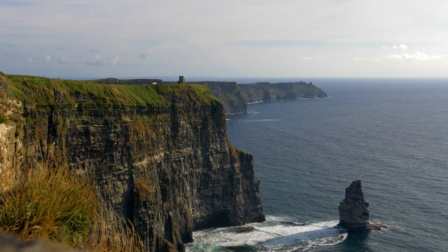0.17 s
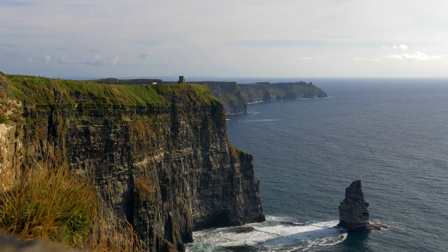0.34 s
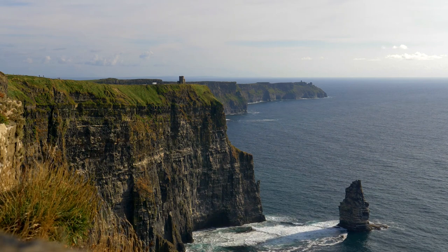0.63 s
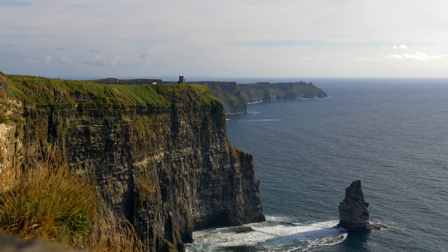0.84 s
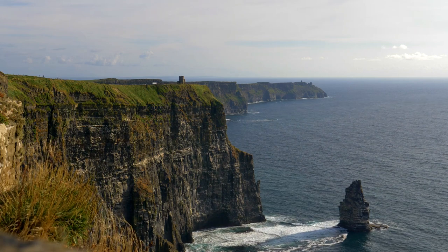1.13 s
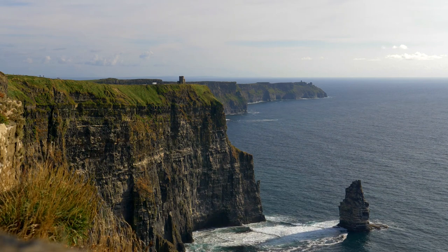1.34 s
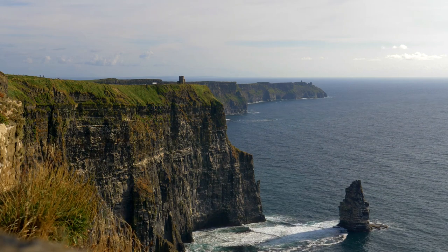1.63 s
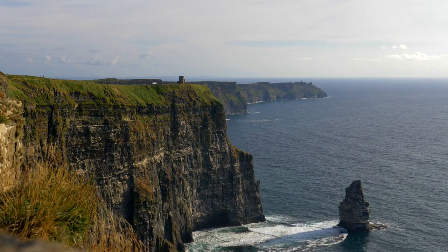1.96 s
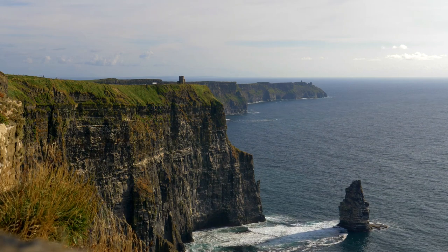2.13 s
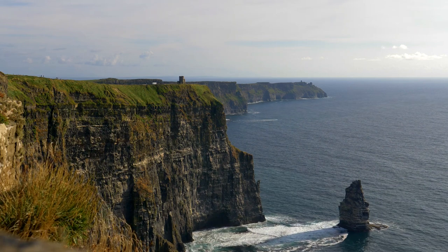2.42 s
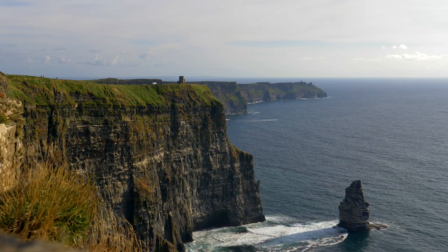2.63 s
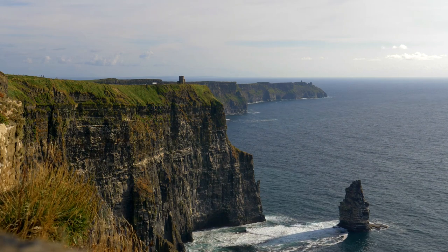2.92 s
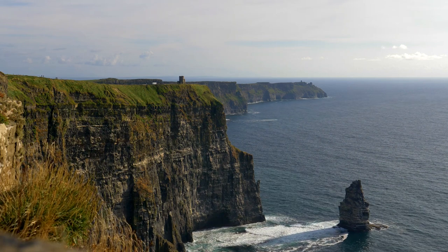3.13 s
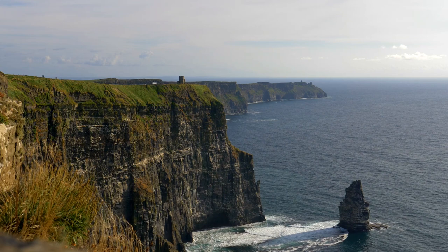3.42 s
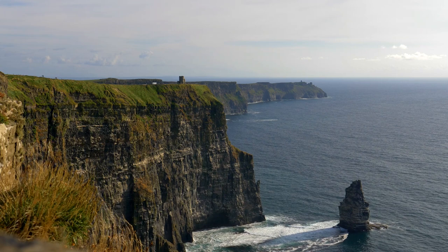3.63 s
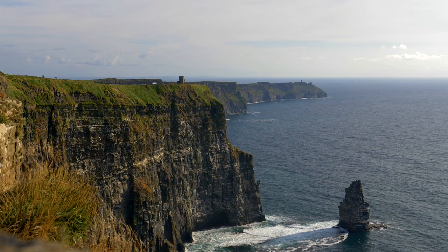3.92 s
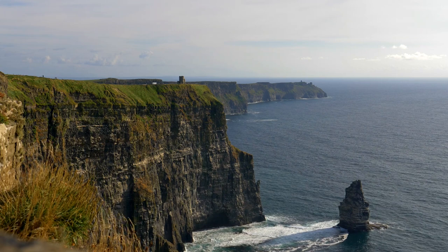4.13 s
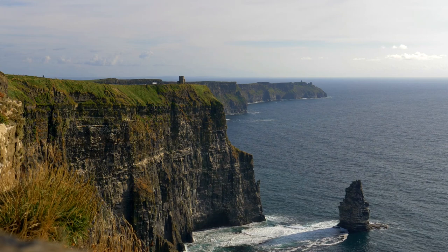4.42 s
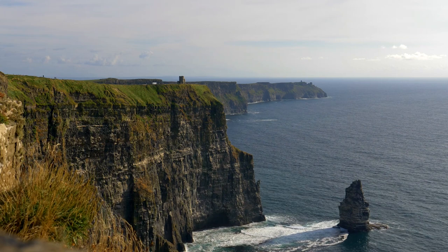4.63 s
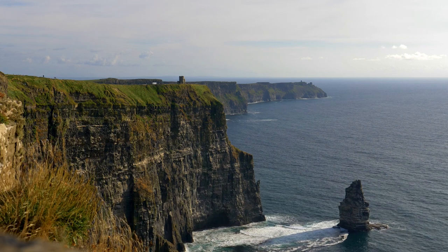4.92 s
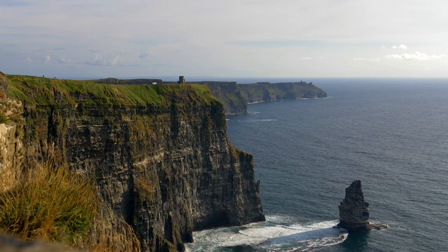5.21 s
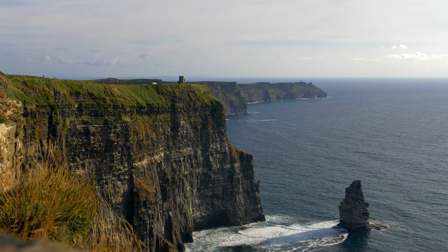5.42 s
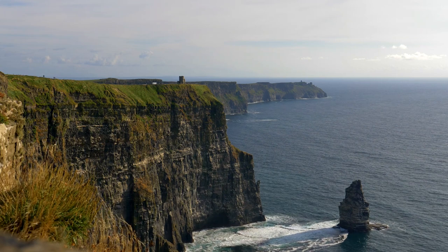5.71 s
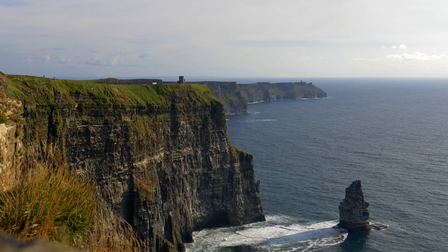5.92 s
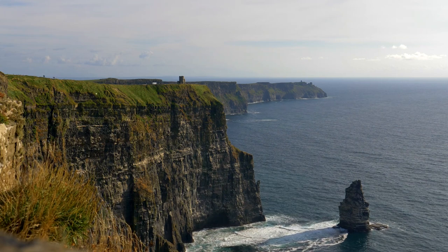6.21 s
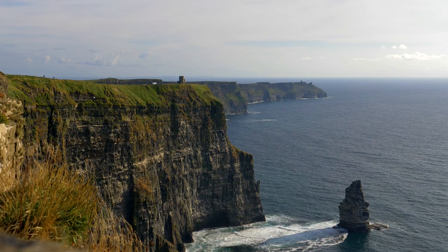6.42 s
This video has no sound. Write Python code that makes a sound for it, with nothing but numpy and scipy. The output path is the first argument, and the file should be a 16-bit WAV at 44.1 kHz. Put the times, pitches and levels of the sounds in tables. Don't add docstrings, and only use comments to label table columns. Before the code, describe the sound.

Overlapping seabird calls, thin whistles and two quick croaks above roaring surf, with a deep wave boom swelling mid-way and hissing foam.

```python
import sys
import numpy as np
from scipy import signal
from scipy.fft import rfft, irfft, next_fast_len
from scipy.io import wavfile
from scipy.ndimage import uniform_filter1d, map_coordinates

SR = 44100
rng = np.random.default_rng(int(sys.argv[2]) if len(sys.argv) > 2 else 0)


def volts_from_decibels(level):
    exponent = np.asarray(level, float) / 20
    return 10 ** exponent


def pcm_store(signal):
    levels = np.round(np.clip(np.atleast_2d(signal), -1, 1) * 32767)
    wavfile.write(sys.argv[1], SR, levels.astype(np.int16).T)


N = 289737

# time_s, level_db
BREAKER_LEVEL = [(0, -55.5), (.25, -55), (.45, -52.5), (.65, -55.5), (1, -55.5), (1.6, -56.5), (2.6, -54),
                 (3.3, -53.5), (3.9, -53.5), (4.4, -52.5), (4.94, -51.5), (5.5, -52), (5.9, -55),
                 (6.57, -55)]
# time_s, moving_water_db, foam_db
WAVE_COURSE = [(0, -58, -60.5), (.5, -52, -60.5), (1.3, -52.5, -56.5), (2.1, -48.5, -52),
               (2.56, -47.5, -47), (2.8, -47, -48.5), (3.3, -44, -47), (3.85, -36.5, -47),
               (4.4, -39.5, -47.5), (5.1, -47.5, -48.5), (5.8, -48, -50), (6.57, -51, -51)]
# time_s, level_db
SURGES = [(.37, -47), (.9, -47), (1.2, -49), (2.05, -45.5), (2.53, -36), (2.92, -37), (3.44, -35.5),
          (3.92, -30), (4.62, -41), (4.97, -36.5), (5.23, -43.5), (5.87, -45), (6.5, -51)]
# frequency_hz, density_db
BREAKER_SPECTRUM = [(200, -21), (400, 0), (650, -1.5), (1100, 0), (1600, 0.5), (2500, -1), (4000, -10),
                    (7000, -16), (11000, -27), (14000, -44)]
RUMBLE_SPECTRUM = [(20, -46), (40, -12), (70, -5.5), (120, 2), (200, -5), (290, -14), (450, -25.5),
                   (900, -49)]
BOOM_SPECTRUM = [(12, -40), (20, -10), (40, -7.5), (75, -2.5), (130, -6.5), (200, -24), (330, -28.5),
                 (600, -57)]
FOAM_SPECTRUM = [(900, -49), (1600, -13), (2500, -1.5), (4000, 1.5), (5500, 2), (8000, -3), (10500, -14.5),
                 (12400, -23), (14000, -39)]
# frequency_hz, correlation (no unit)
SEA_LIKENESS = [(60, -0.15), (150, -0.54), (280, -0.37), (500, -0.51), (1300, -0.27), (3000, -0.39),
                (6000, -0.57), (9000, -0.61), (13000, -0.085)]
BOOM_LIKENESS = [(30, 0.75), (60, 0.94), (100, 0.51), (140, 0.54), (250, 0.63)]
# frequency_hz, phase_rad
SURF_PHASE = [(40, -.07), (60, -.4), (80, -.7), (100, -1.3), (127, -2.2), (160, -3), (270, -4.4),
              (520, -3.14)]
# start_s, level_db, fall_by_20_db_s, bearing_deg
WATER_SLAPS = [
    (1.737, -41.5, .03, -65),
    (2.11, -45, .07, -65),
    (2.5, -45, .12, -62),
    (6.0, -48, .04, -60),
]
# start_s, length_s, level_db, pulse_rate_hz, bearing_deg
CROAKS = [
    (2.418, .026, -38.5, 480, 20),
    (3.424, .046, -38.5, 325, 14),
]
# centre_hz, width_hz, level_db
THROAT_RESONANCES = [(2250, 280, 1), (2950, 380, 0)]
# start_s, length_s, start_hz, end_hz, level_db
FAR_CALLS = [(0, .07, 2928, 2778, -47), (.812, .08, 2040, 1945, -49), (1.345, .125, 1870, 1735, -53),
             (1.381, .06, 4318, 3990, -52), (2.352, .036, 2970, 2815, -42), (2.832, .105, 2542, 2502, -51),
             (4.23, .046, 2480, 2485, -46), (4.422, .07, 2734, 2530, -50), (4.973, .143, 2880, 2507, -49),
             (5.302, .05, 2363, 2660, -47.5), (5.35, .035, 3150, 3210, -49.5),
             (5.455, .045, 2880, 2945, -43), (5.487, .035, 3750, 3750, -46), (5.535, .045, 2690, 2595, -39),
             (5.585, .064, 2580, 2375, -46), (5.773, .046, 2391, 2473, -47),
             (5.82, .065, 3120, 2960, -47.5), (5.923, .06, 4144, 3790, -50)]
FAR_BEARINGS = [-33, -72, -63, -25, -24, -66, -20, -26, -37, -66, 75, -30, -41, -14, -14, -63, -76, -59]
# start_s, length_s, start_hz, end_hz, level_db
PEEPS = [(1.375, .075, 4520, 5010, -46), (1.725, .073, 4870, 4508, -52), (2.482, .096, 4964, 5035, -47),
         (4.11, .07, 4975, 5020, -47.5), (4.175, .055, 5060, 5145, -49), (4.468, .066, 4620, 4860, -41.5),
         (4.833, .076, 4679, 4490, -49), (5.2, .06, 5200, 4900, -47), (5.871, .028, 5699, 5682, -51)]
PEEP_BEARINGS = [-22, -28, -29, -22, -22, -10, -20, -8, -21]
# time_s, pitch_hz, level_db
WHISTLES = [
    [(0.343, 4663, -50), (0.365, 4764, -40), (0.445, 5093, -45), (0.485, 5050, -47), (0.589, 4773, -45),
     (0.659, 4647, -58)],
    [(1.258, 4200, -46), (1.272, 4620, -42), (1.29, 4880, -44), (1.318, 5080, -49), (1.345, 4990, -46),
     (1.433, 5125, -50), (1.546, 4936, -49), (1.6, 4942, -60)],
    [(3.31, 4870, -47), (3.33, 4840, -42), (3.42, 4710, -37), (3.478, 4860, -43), (3.5, 4800, -48)],
    [(4.723, 4225, -44), (4.763, 4329, -42), (4.81, 4640, -51), (4.849, 4823, -49), (4.949, 4848, -56)],
    [(5.412, 4919, -53), (5.521, 5402, -45), (5.56, 5520, -56), (5.6, 5640, -47), (5.659, 5681, -53)],
]
WHISTLE_BEARINGS = [-80, -86, -14, -18, -14]
# start_s, length_s, top_of_second_partial_hz, end_hz, level_db
NEAR_CRIES = [
    (.055, 0.13, 2105, 2035, -47.5),
    (0.391, 0.25, 2220, 2003, -52),
    (0.825, 0.25, 2260, 2014, -47),
    (1.297, 0.18, 2253, 1905, -42.5),
    (1.773, .186, 2290, 1750, -40),
    (2.304, 0.0546, 2370, 2398, -40.5),
    (2.376, .12, 2410, 1753, -39),
    (5.864, 0.21, 2870, 2200, -45.5),
]
# top_at (share of length), start_below_top (share of pitch), fall_bend (exponent), level_change_db
CRY_SHAPES = [(.1, .01, 1.05, 0), (.3, .045, 1.4, 2), (.24, .04, 1.2, 0), (.27, .04, 1.2, 2),
              (.29, .08, .9, -2), (.93, .11, 1.05, 6), (.2, .005, .62, -1), (.26, .035, .75, -9)]
# bearing_deg, third_start_db, third_end_db, upper_start_db, upper_end_db
CRY_COLOURS = [(-20, -1, -2, -18, -16), (-12, -9, -1, -24, -13), (-10, -8, -6, -32, -7),
               (-14, -9, -19, -24, -26), (-17, -2, -45, -20, -30), (-16, -4, -10, -14, -22),
               (-19, -18, -22, -24, -26), (-10, 2, -40, -14, -30)]
# multiple (of the second partial), level_db, colour (0 is none, 1 third, 2 upper)
CRY_PARTIALS = [(.5, -21, 0), (1, 1.5, 0), (1.5, 3.5, 1), (2, 2.5, 2), (2.5, -3, 2)]


def unit(x):
    return x / np.sqrt(np.mean(x ** 2) + 1e-20)


def along(points, hz):
    f, v = np.transpose(points)
    return np.interp(np.log(hz + 1), np.log(f + 1), v)


def curves(rows, t):
    s, *columns = np.transpose(rows)
    return [np.interp(t, s, column) for column in columns]


def wobble(rate_hz, size=N):
    knots = rng.standard_normal(int(size * 200 / SR) + 4)
    return map_coordinates(knots, [np.arange(size) * min(rate_hz, 200) / SR])


def filtered(x, response):
    size = next_fast_len(N + 8192)
    return irfft(rfft(x, size) * response(np.fft.rfftfreq(size, 1 / SR)), size)[..., :N]


def wide(bearing_deg):
    angle = np.radians(bearing_deg)
    return np.array([[np.cos(angle)], [np.sin(angle)]])


def turbulent_noise(spectrum, likeness, patchy_db):
    z = signal.stft(rng.standard_normal((2, N)), nperseg=512)[2]
    patches = uniform_filter1d(rng.standard_normal(z.shape[1:]), size=8, axis=0)
    patches = uniform_filter1d(patches, size=12, axis=1)
    pair = signal.istft(z * volts_from_decibels(patchy_db * unit(patches)), nperseg=512)[1][:, :N]

    def mid_side_response(hz):
        angle = np.arccos(np.clip(along(likeness, hz), -.98, .98)) / 2
        return volts_from_decibels(along(spectrum, hz)) * [np.cos(angle), np.sin(angle)]

    mid, side = filtered(pair, mid_side_response)
    return np.array([mid + side, mid - side]) / np.std(mid)


def phase_turned(x, start_rad):
    sides = np.array([[-1], [1]])
    return filtered(x, lambda hz: np.exp(.5j * (along(SURF_PHASE, hz) - start_rad) * sides))


def far_breakers(t, surge):
    level_db, = curves(BREAKER_LEVEL, t)
    balance = volts_from_decibels([[-.6], [.6]])
    noise = turbulent_noise(BREAKER_SPECTRUM, SEA_LIKENESS, patchy_db=1.12)
    return phase_turned(volts_from_decibels(level_db + 2.5 + surge) * balance * noise, -np.pi)


def rumble(swell_db):
    level_db = -47 + 0.22 * swell_db + 1.13 * wobble(5)
    lean_db = 2.5 + 0.41 * swell_db
    gain = volts_from_decibels(level_db + 0.5 * np.array([lean_db, -lean_db]))
    noise = turbulent_noise(RUMBLE_SPECTRUM, SEA_LIKENESS, patchy_db=0.42)
    return phase_turned(gain * noise, -np.pi)


def surge_power(t):
    rise_s, fall_s = 0.023, 0.15
    power = 0
    for s, db in SURGES:
        age = np.where(t < s, (s - t) / (2 * rise_s), (t - s) / fall_s)
        power = power + volts_from_decibels(2 * db - 2 * 20 * age)
    return power


def boom(t, weight_db):
    level_db = 10 * np.log10(volts_from_decibels(2 * weight_db) + surge_power(t))
    balance = volts_from_decibels([[1.3], [-1.3]])
    noise = turbulent_noise(BOOM_SPECTRUM, BOOM_LIKENESS, patchy_db=1.36)
    return phase_turned(volts_from_decibels(level_db + 0.24 * wobble(4.5)) * balance * noise, 0)


def foam(foam_db, surge):
    tilt_db = 0.07 + 0.1962 * (foam_db - foam_db.max())
    hiss = turbulent_noise(FOAM_SPECTRUM, SEA_LIKENESS, patchy_db=1.5)
    dull = filtered(hiss, lambda hz: 1 / (1 + (hz / 5200) ** 4))
    hiss = volts_from_decibels(-tilt_db) * dull + volts_from_decibels(tilt_db) * (hiss - dull)
    balance = volts_from_decibels([[.5], [-.5]])
    return volts_from_decibels(foam_db + 0.35 + .5 * surge + 0.12 * wobble(5.6)) * balance * hiss


def sea():
    t = np.arange(N) / SR
    weight_db, foam_db = curves(WAVE_COURSE, t)
    surge = wobble(2.666)
    swell_db = weight_db - weight_db.mean()
    return far_breakers(t, surge) + rumble(swell_db) + boom(t, weight_db) + foam(foam_db, surge)


def slaps():
    rise_s = .004
    noise = rng.standard_normal((len(WATER_SLAPS), N))
    noise = unit(filtered(noise, lambda hz: volts_from_decibels(along(FOAM_SPECTRUM, 1.4 * hz))))
    out = np.zeros((2, N))
    for (s, db, fall_s, bearing), hiss in zip(WATER_SLAPS, noise):
        age = np.maximum(np.arange(N) / SR - s, 0)
        out += wide(bearing) * volts_from_decibels(db - 20 * age / fall_s) * (1 - np.exp(-age / rise_s)) * hiss
    return out


def cliff(x):
    delay_s, fall_by_60_db_s = .012, .2
    age = np.arange(SR // 4) / SR
    tail = rng.standard_normal((2, len(age))) * volts_from_decibels(-60 * age / fall_by_60_db_s) * (age > delay_s)
    return signal.fftconvolve(x, tail / np.linalg.norm(tail[0]), axes=1)[:, :N]


def throat(f):
    response = 0
    for k, (centre, width, db) in enumerate(THROAT_RESONANCES):
        damping = 1j * f * width
        response = response + (-1) ** k * volts_from_decibels(db) * damping / (centre * centre - f * f + damping)
    return response


def croaks():
    t = np.arange(N) / SR
    out = np.zeros((2, N))
    for s, length, db, rate_hz, bearing in CROAKS:
        cycles = np.cumsum(rate_hz * (1 + .1 * wobble(200))) / SR
        gate = np.exp(45 * (np.cos(2 * np.pi * cycles) - 1))
        breath = unit(gate * rng.standard_normal(N))
        voice = unit(filtered(unit(gate) + .7 * breath, lambda f: throat(f) ** 2))
        share = np.clip((t - s) / length, 0, 1)
        envelope = np.sin(np.pi * share ** .45) ** .5
        out += wide(bearing) * volts_from_decibels(db) * envelope * voice
    return out


def fade(t, attack_s, release_s, depth_db):
    attack = np.clip(1 - (t - t[0]) / attack_s, 0, 1)
    release = np.clip(1 - (t[-1] - t) / release_s, 0, 1)
    return -depth_db * (attack + release)


def glide(s, length, start_hz, end_hz, db):
    u = np.linspace(0, 1, num=20)
    t = s + length * u
    hz = start_hz + (end_hz - start_hz) * u
    return np.transpose([t, hz, db + fade(t, .015, .015, 7)])


def cry(row, shape, colour_db):
    s, length, top_hz, end_hz, db = row
    top_at, below, fall_bend, change_db = shape
    third_db, third_end_db, upper_db, upper_end_db = colour_db
    u = np.linspace(0, 1, num=30)
    t = s + length * u
    rising = np.clip(1 - u / top_at, 0, 1)
    falling = np.clip((u - top_at) / (1 - top_at), 0, 1)
    hz = top_hz * (1 - below * rising ** 1.51) - (top_hz - end_hz) * falling ** fall_bend
    level_db = db + change_db * (u - .5) + fade(t, .018, .026, 10)
    third = third_db + (third_end_db - third_db) * u
    upper = upper_db + (upper_end_db - upper_db) * u
    return np.transpose([t, hz, level_db, third, upper])


def sing(out, rows, bearing, partials, flutter_db):
    start = round(rows[0][0] * SR)
    t = np.arange(start, round(rows[-1][0] * SR)) / SR
    hz, level_db, *colour_db = curves(rows, t)
    colour_db = [0, *colour_db]
    hz = uniform_filter1d(hz, size=350, mode="nearest")
    hz = hz * (1 + 0.0016 * wobble(58.5, size=len(t)))
    phase = 2 * np.pi * np.cumsum(hz) / SR
    tone = 0
    for multiple, db, colour in partials:
        partial_db = db + colour_db[colour] + flutter_db * wobble(41.7, size=len(t))
        tone = tone + volts_from_decibels(partial_db) * np.sin(multiple * phase)
    edge = np.clip(np.minimum(t - t[0], t[-1] - t) / .003, 0, 1)
    out[:, start:start + len(t)] += wide(bearing) * np.sqrt(2) * volts_from_decibels(level_db) * edge * tone


def gulls():
    out = np.zeros((2, N))
    whistles = WHISTLES + [glide(*row) for row in PEEPS]
    for rows, bearing in zip(whistles, WHISTLE_BEARINGS + PEEP_BEARINGS):
        sing(out, rows, bearing, [(1, 0, 0)], flutter_db=1.2)
    for row, bearing in zip(FAR_CALLS, FAR_BEARINGS):
        sing(out, glide(*row), bearing, [(1, 1, 0), (1.5, -18, 0), (.5, -21, 0)], flutter_db=1.8)
    for row, shape, (bearing, *colour_db) in zip(NEAR_CRIES, CRY_SHAPES, CRY_COLOURS):
        sing(out, cry(row, shape, colour_db), bearing, CRY_PARTIALS, flutter_db=1.8)
    return out


def scene():
    water = sea() + slaps()
    birds = croaks() + gulls()
    return water + birds + volts_from_decibels(-18) * cliff(birds)


def low_pass(x):
    return signal.sosfilt(signal.butter(12, 13630, fs=SR, output="sos"), x)


def record(dry):
    return low_pass(dry)


dry = scene()
out = record(dry)
pcm_store(out)
```